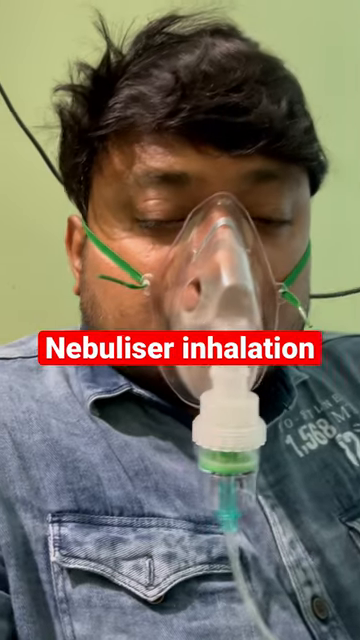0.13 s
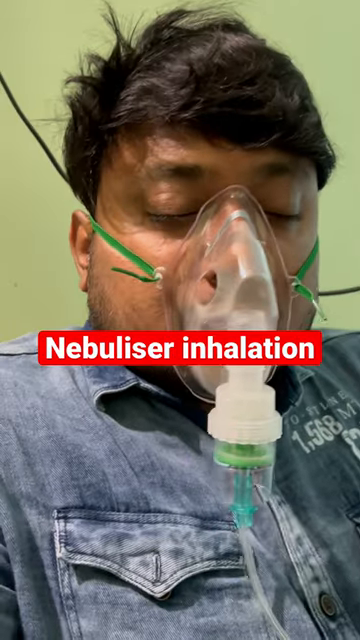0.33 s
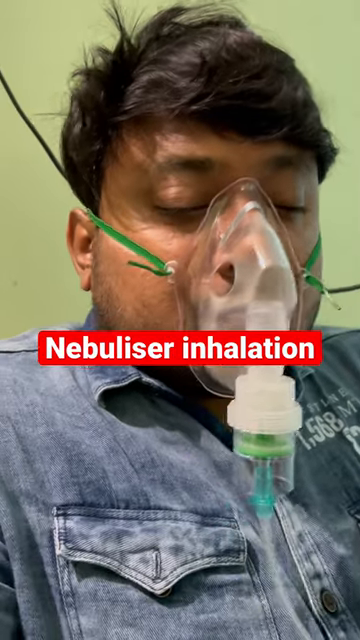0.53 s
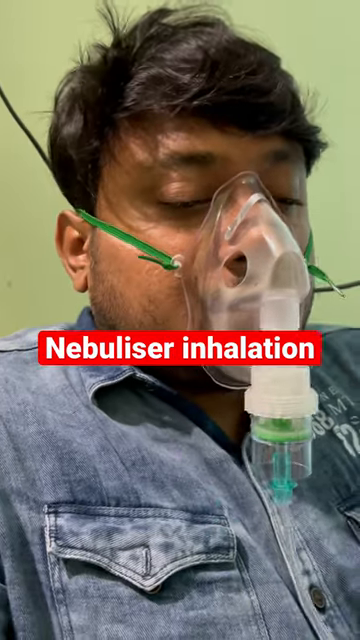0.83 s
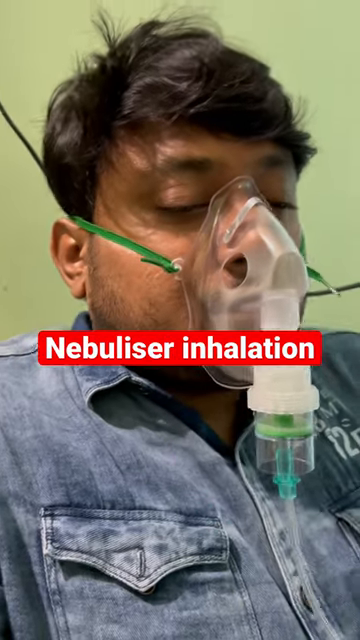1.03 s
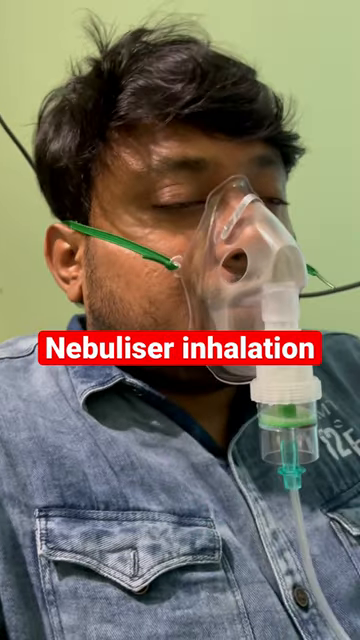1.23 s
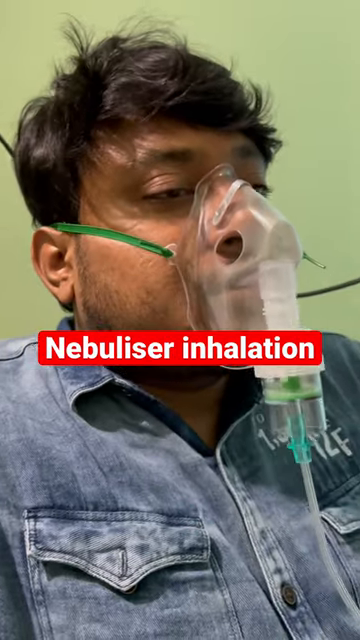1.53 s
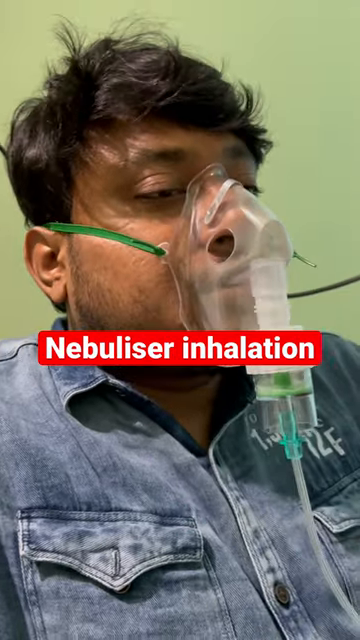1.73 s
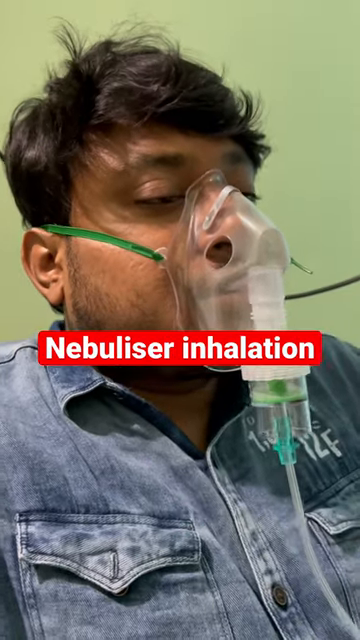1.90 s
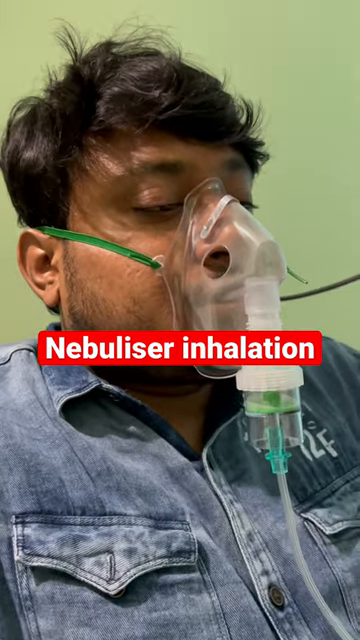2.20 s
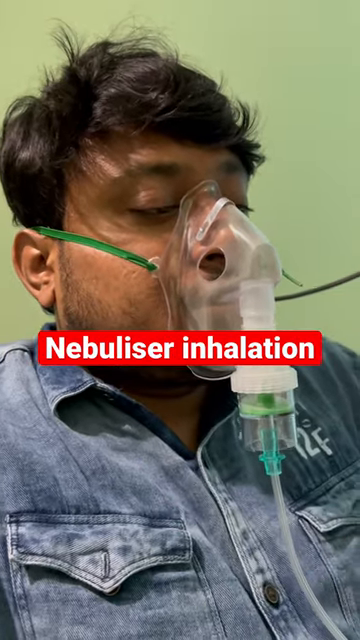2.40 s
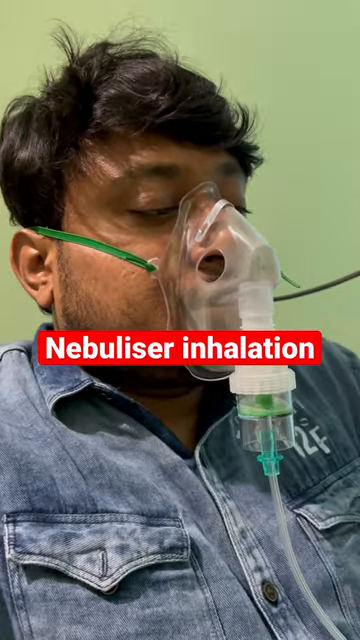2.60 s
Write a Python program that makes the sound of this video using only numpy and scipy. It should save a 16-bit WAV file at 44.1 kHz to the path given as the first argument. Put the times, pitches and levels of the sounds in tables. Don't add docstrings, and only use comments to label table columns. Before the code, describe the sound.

A nebulizer runs without pause, heard close in stereo in a room. Pressurized air hisses brightly from the mist cup and rings hollow in mask and tube, fluttering rapidly with the piston strokes. Below it a small compressor hums low, slowly beating, with soft rumble. The hiss swells to its loudest around 0.1 seconds, eases by 0.5, then gradually fades and loses some top sharpness until about 2.75 seconds.

```python
import sys
import numpy as np
from scipy import signal
from scipy.fft import rfft, irfft, next_fast_len
from scipy.io import wavfile
from scipy.ndimage import uniform_filter1d, map_coordinates

SR = 44100
rng = np.random.default_rng(int(sys.argv[2]) if len(sys.argv) > 2 else 0)


def transcribe(signal):
    frames = np.atleast_2d(signal).T
    limited = np.clip(frames, -1, 1)
    pcm = np.round(limited * 32767).astype(np.int16)
    wavfile.write(sys.argv[1], SR, pcm)


def undo_db(level):
    steps = np.asarray(level, float) / 20
    return 10 ** steps


N = 121275
SHAFT_HZ = 45.27


def unit(x):
    return x / np.sqrt(np.mean(x ** 2) + 1e-20)


def along(points, hz):
    point_hz, value = np.transpose(points)
    return np.interp(np.log(hz + 1), np.log(point_hz + 1), value)


def wobble(rate_hz):
    knots = rng.standard_normal(int(N * rate_hz / SR) + 4)
    return map_coordinates(knots, [np.arange(N) * rate_hz / SR])


def filtered(x, response):
    size = next_fast_len(N + 8192)
    spectrum = rfft(x, size) * response(np.fft.rfftfreq(size, 1 / SR))
    return irfft(spectrum, size)[..., :N]


def hollow(peaks, steep):
    def gain(hz):
        power = 0
        for ring_hz, width_hz, level_db in peaks:
            power = power + undo_db(2 * level_db) / (1 + (2 * (hz - ring_hz) / width_hz) ** 2) ** steep
        return np.sqrt(power)
    return gain


# pitch_hz [Hz], lead_rad [radians]
PORT_LEAD = [(0, 0), (650, .9), (1700, 0), (2150, -.9), (4000, -1.2), (6050, -3.14), (7750, -6.28),
             (15850, -17.1)]
# pitch_hz [Hz], likeness [0 to 1]
PORT_LIKENESS = [(120, 1), (300, .97), (800, .95), (1600, .995), (3000, .8), (4300, .4), (5200, .96),
                 (15000, .98)]
# pitch_hz [Hz], left_over_right_db [dB]
PORT_LEAN = [(2300, 0), (2900, -6), (3700, 0)]


def rush(gain, pulse, patchy_db):
    spectrum = signal.stft(rng.standard_normal((2, N)) * pulse, nperseg=512)[2]
    patches = uniform_filter1d(rng.standard_normal(spectrum.shape[1:]), 6, axis=0)
    patches = unit(uniform_filter1d(patches, 10, axis=1))
    pair = signal.istft(spectrum * undo_db(patchy_db * patches), nperseg=512)[1][:, :N]

    def shares(hz):
        angle = np.arccos(np.clip(along(PORT_LIKENESS, hz), -1, 1)) / 2
        return gain(hz) * np.array([np.cos(angle), np.sin(angle)])

    def ports(hz):
        side = np.array([[0.5], [-0.5]])
        lead_rad = np.interp(hz, *np.transpose(PORT_LEAD))
        return undo_db(side * along(PORT_LEAN, hz)) * np.exp(-1j * side * lead_rad)

    same, other = filtered(pair, shares)
    return unit(filtered(np.array([same + other, same - other]), ports))


# pitch_hz [Hz], level_db [dB per Hz]
RUMBLE = [(20, -22), (48, -8), (63, 2), (78, -8), (130, -9), (250, -9), (380, -5), (900, -30)]


def housing_rumble():
    return undo_db(-53) * rush(lambda hz: undo_db(along(RUMBLE, hz)), 1, patchy_db=-3.7)


# [dB, relative]
STROKE_TONES = [(1, -0.5), (2, -5.5), (4, -6), (5, -20.5), (6, -8.5), (7, -13), (8, -17.5), (9, -19.5),
                (10, -15.5), (11, -34)]
# multiple [of the shaft speed], level_db [dB rms]
HIGH_TONES = [(16, -67), (17, -64), (18, -61), (24, -63), (25, -68)]


def compressor_hum():
    beat_peak_s = 0.003986
    t = np.arange(N) / SR - beat_peak_s
    shaft_rad = 2 * np.pi * SHAFT_HZ * t + 0.0074 * wobble(2.5)
    loudest_db = max(level_db for multiple, level_db in STROKE_TONES)
    tones = [(multiple, level_db - loudest_db - 44) for multiple, level_db in STROKE_TONES]
    hum = np.zeros((2, N))
    for multiple, level_db in tones + HIGH_TONES:
        start_rad = 0 if multiple == 2 else rng.uniform(0, 2 * np.pi)
        apart_rad = np.tanh((multiple * SHAFT_HZ / 356) ** 2.3) / 2
        port_rad = np.array([[-apart_rad], [apart_rad]])
        level = undo_db(level_db - 0.7 * wobble(3.76))
        hum += level * np.cos(multiple * shaft_rad + start_rad + port_rad)
    hum += undo_db(-50) * np.cos(2 * np.pi * 99.88 * t)
    hum += undo_db(-64) * np.cos(2 * np.pi * 50.02 * t)
    return np.sqrt(2) * hum


# start_s [s], level_db [dB]
NEARNESS = [
    (0.0, -36),
    (0.11, -34.5),
    (0.53, -37),
    (1.65, -38.5),
    (2.75, -39),
]


def nearness_db():
    near_db = np.interp(np.arange(N) / SR, *np.transpose(NEARNESS))
    return near_db - near_db.mean()


def puffs(late_s):
    stroke_rad = 2 * np.pi * SHAFT_HZ * (np.arange(N) / SR - late_s)
    return 1 + 0.09 * np.cos(stroke_rad) + 0.057 * np.cos(2 * stroke_rad)


# pitch_hz [Hz], width_hz [Hz], level_db [dB]
MASK_NOTES = [(597.7, 22.2, 1), (586.5, 110, -6.5), (740, 62, -17.5), (1003, 200, -23.5), (1242, 185, -16),
              (1988, 155, -11.5), (2137, 140.0, -10.0), (2370, 540, -18.5), (2890, 140, -16),
              (3460, 440, -27)]


def mask_air():
    air = rush(hollow(MASK_NOTES, steep=1.637), puffs(late_s=0.011), patchy_db=-0.35)
    return undo_db(-35.3 + 0.65 * nearness_db() + 0.19 * wobble(5.2)) * air


# pitch_hz [Hz], width_hz [Hz], level_db [dB]
CUP_NOTES = [(4110, 77, -25), (5003, 160.0, -1.86), (5422, 240.0, -1), (6576, 183, -8), (6360, 160, -21.5),
             (7260, 720, -19.5), (8825, 530, -14), (9397, 190, -7.5), (9870, 170, -8), (11190, 360, -22),
             (12200, 880.0, -18), (12950, 340.0, -26), (14400, 420, -8.5), (15090, 610, -4)]
# from_hz [Hz], to_hz [Hz]
BEAMED_RANGES = [(6000, 8000), (11000, 16000)]


def cup_jet():
    spread, beamed = [], []
    for note in CUP_NOTES:
        beams = any(from_hz < note[0] < to_hz for from_hz, to_hz in BEAMED_RANGES)
        (beamed if beams else spread).append(note)
    near_db = nearness_db()
    cup = rush(hollow(spread, steep=1.75), 1, patchy_db=-0.5)
    beam = rush(hollow(beamed, steep=1.6), puffs(late_s=0), patchy_db=2.1)
    cup_level = undo_db(-34.5 + 0.83 * near_db + 0.18 * wobble(7.5))
    beam_level = undo_db(-36 + 1.9 * near_db + 0.2 * wobble(6.5))
    return cup_level * cup + beam_level * beam


def scene():
    return housing_rumble() + compressor_hum() + mask_air() + cup_jet()


def band_limit(x):
    return signal.sosfilt(signal.butter(12, 16410, fs=SR, output="sos"), x)


def record(dry):
    mix = filtered(dry, lambda hz: hz < 15750)
    return band_limit(mix)


dry = scene()
out = record(dry)
transcribe(out)
```